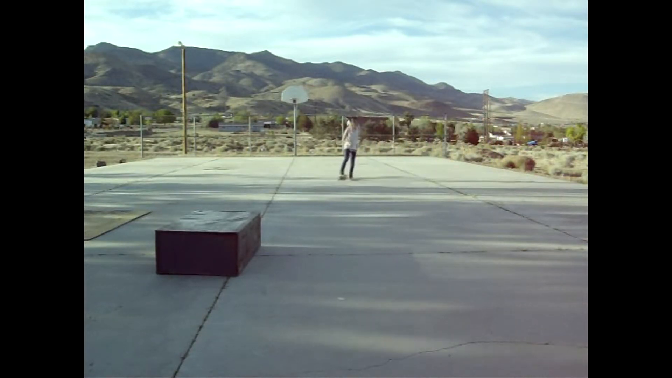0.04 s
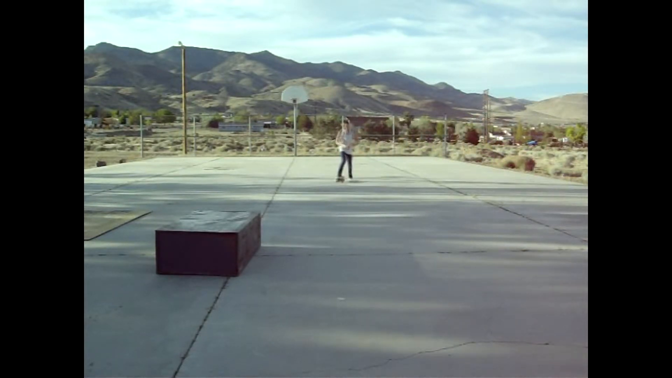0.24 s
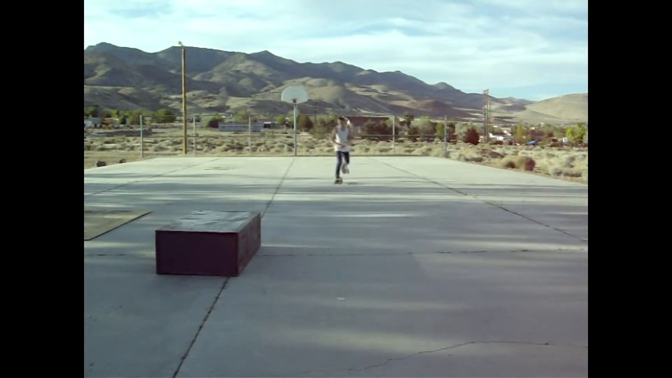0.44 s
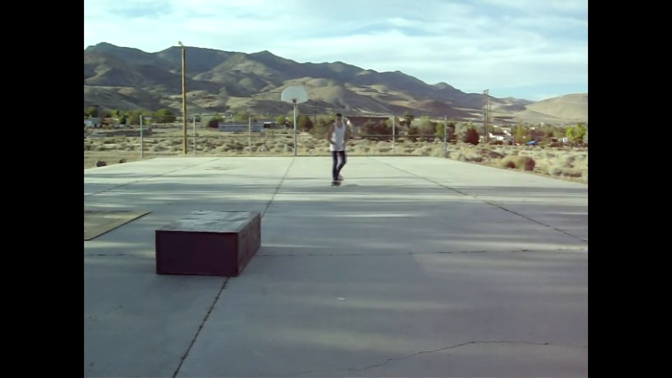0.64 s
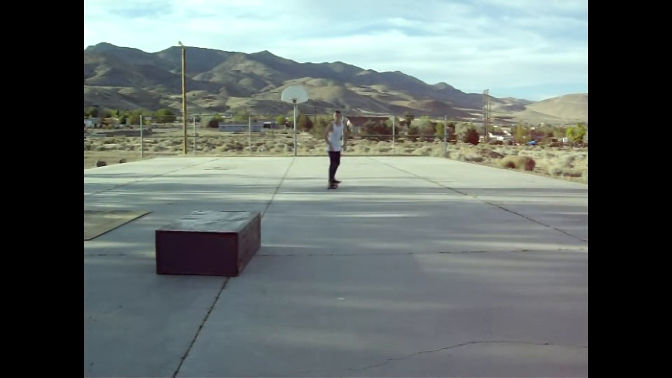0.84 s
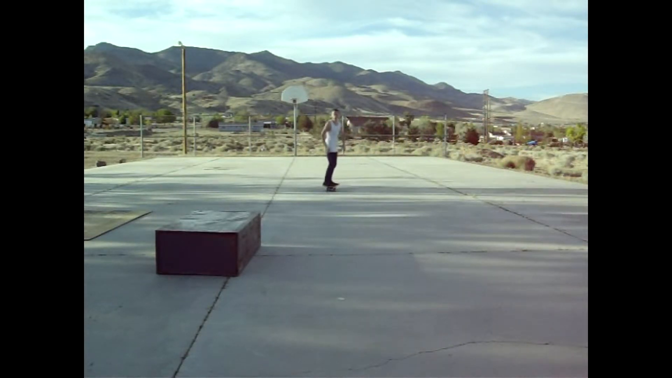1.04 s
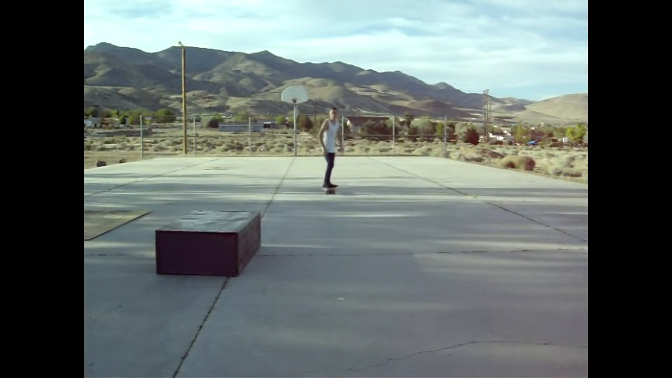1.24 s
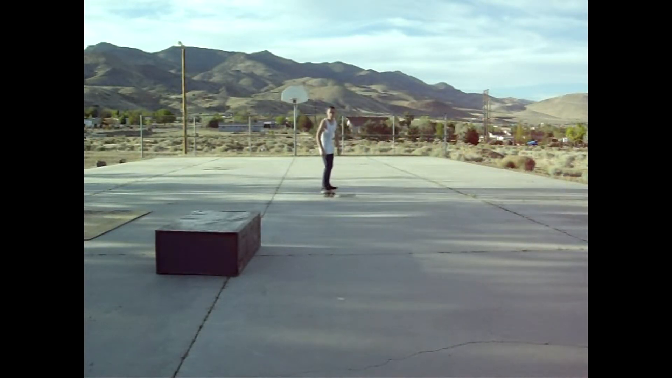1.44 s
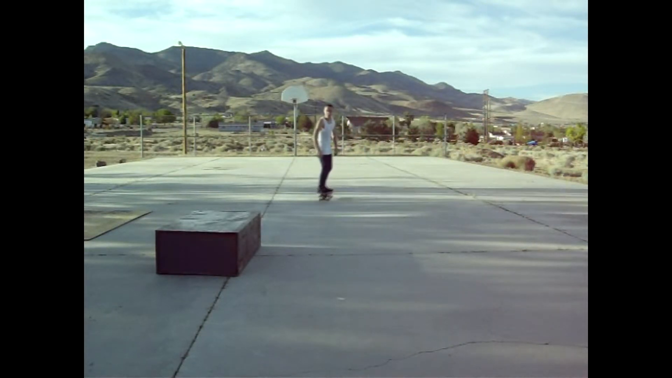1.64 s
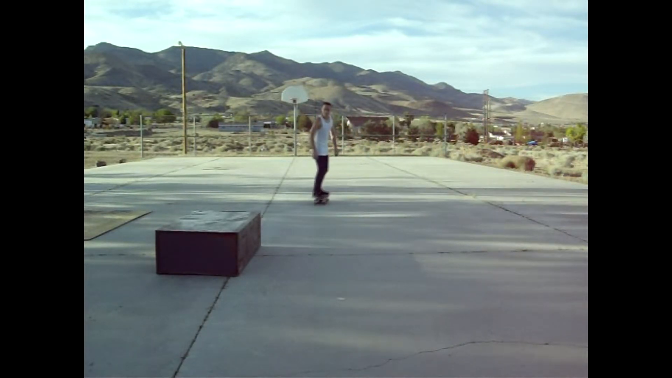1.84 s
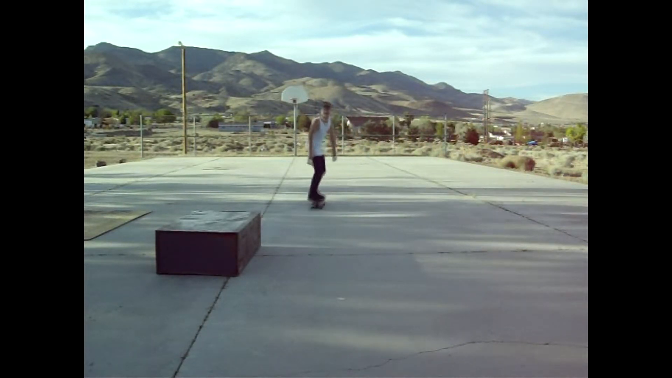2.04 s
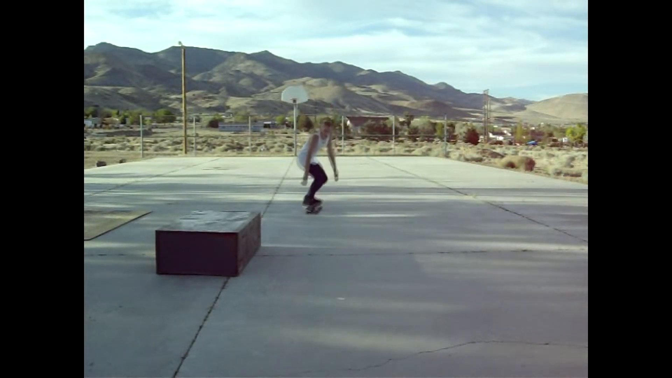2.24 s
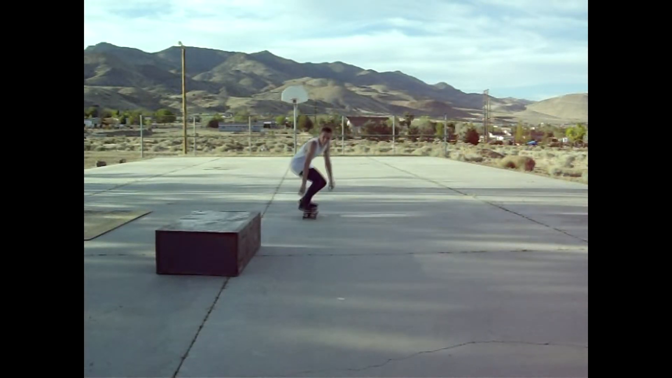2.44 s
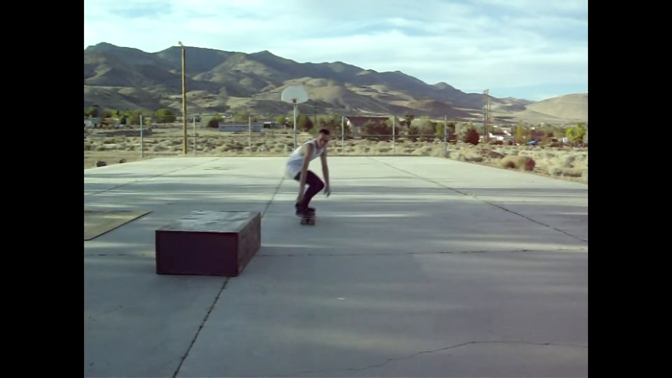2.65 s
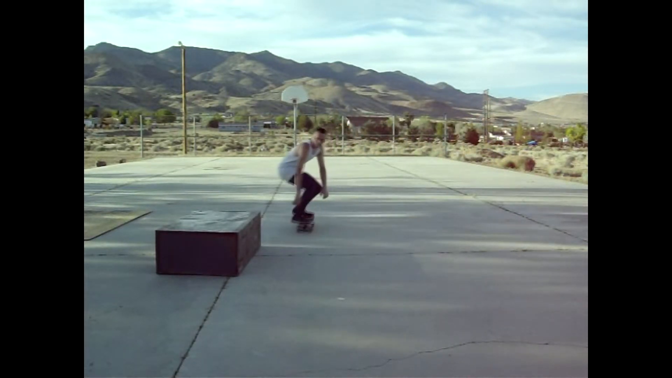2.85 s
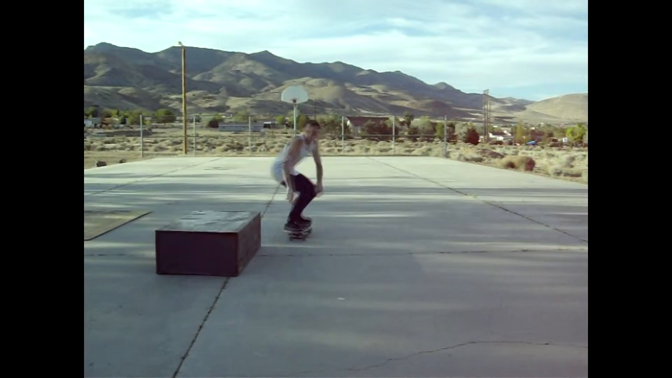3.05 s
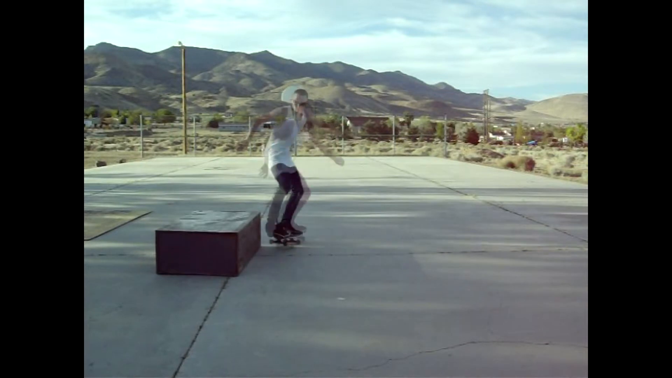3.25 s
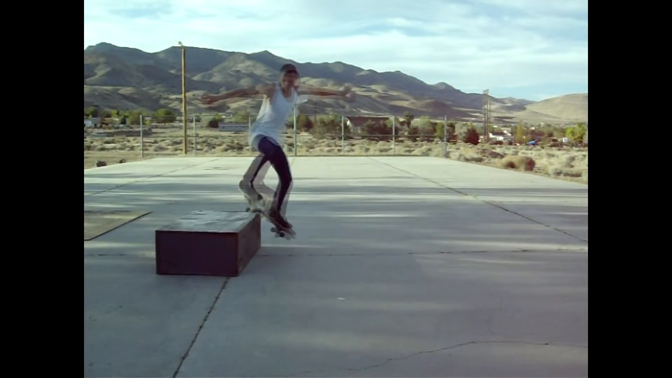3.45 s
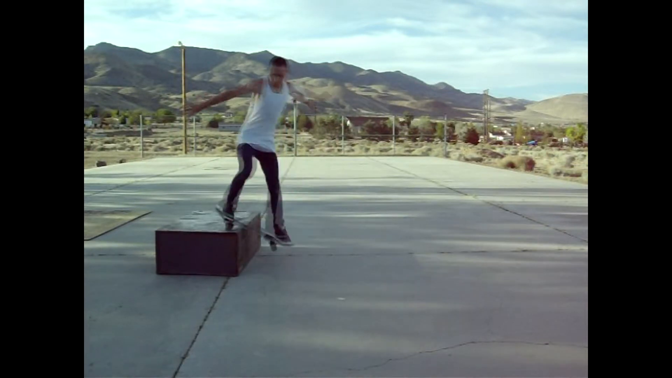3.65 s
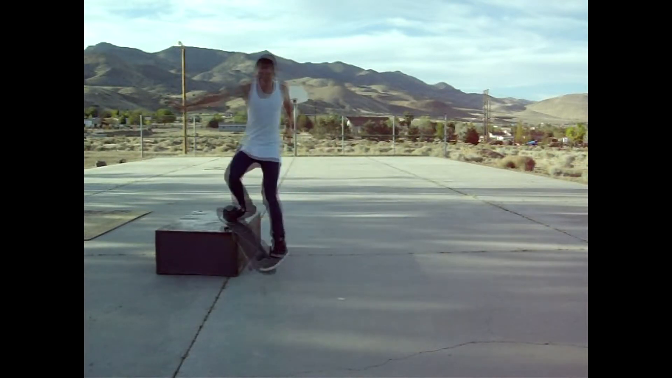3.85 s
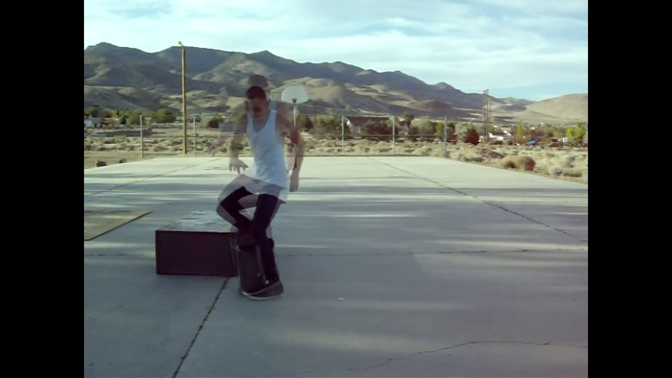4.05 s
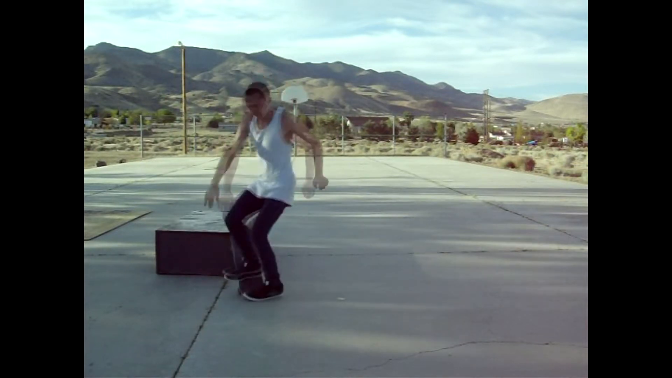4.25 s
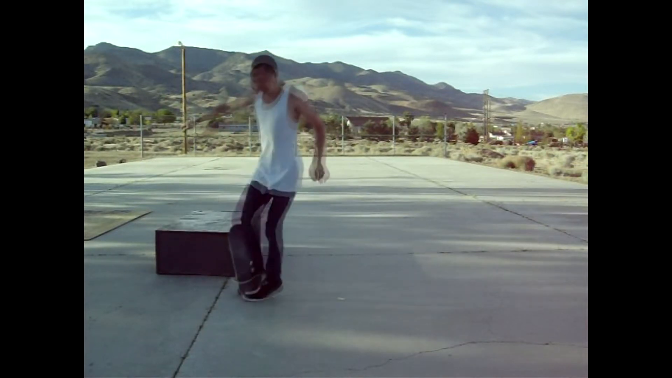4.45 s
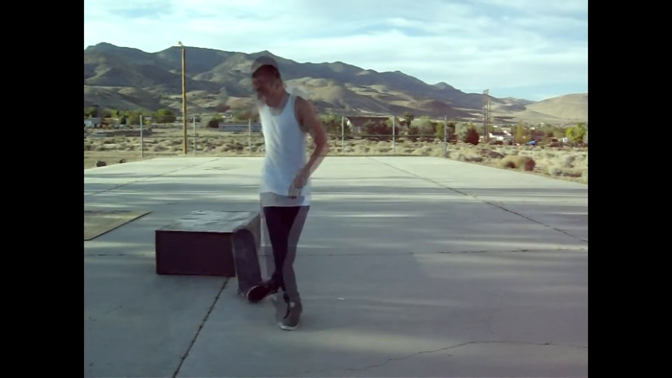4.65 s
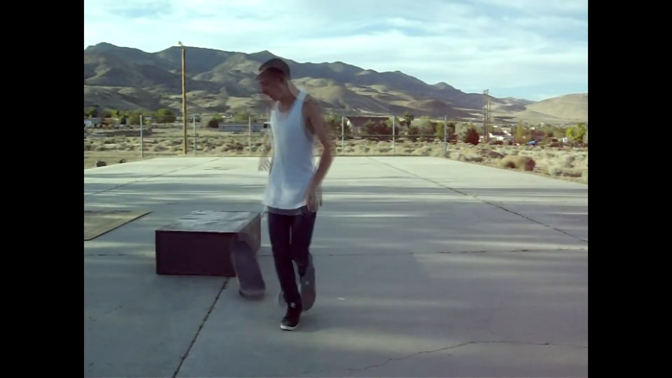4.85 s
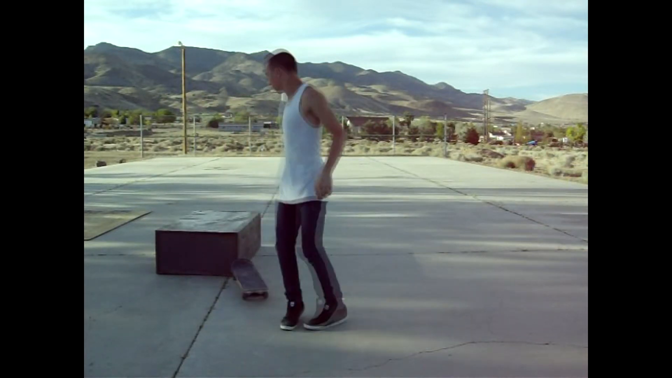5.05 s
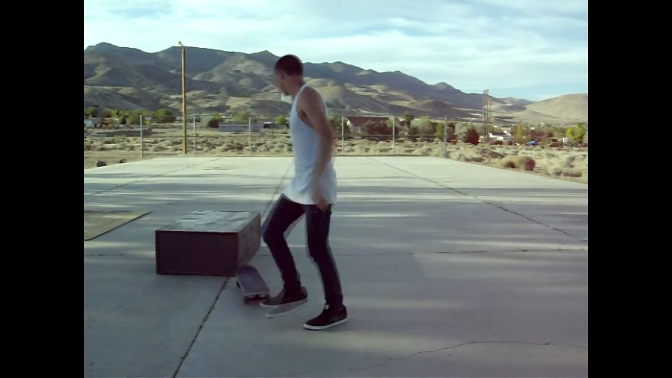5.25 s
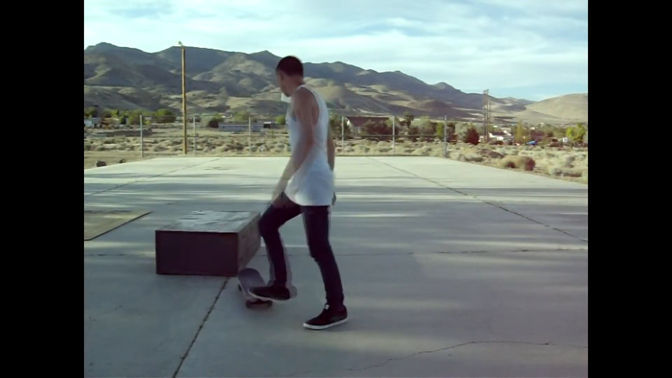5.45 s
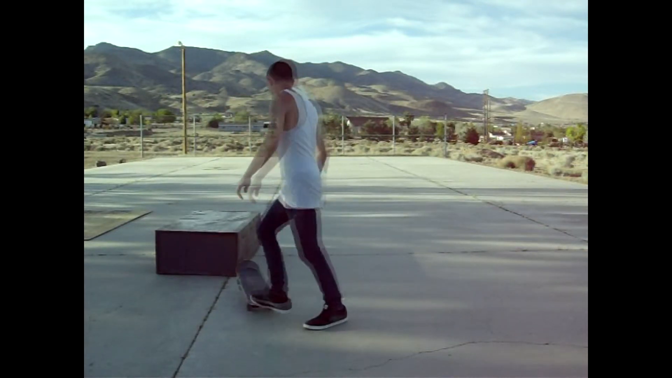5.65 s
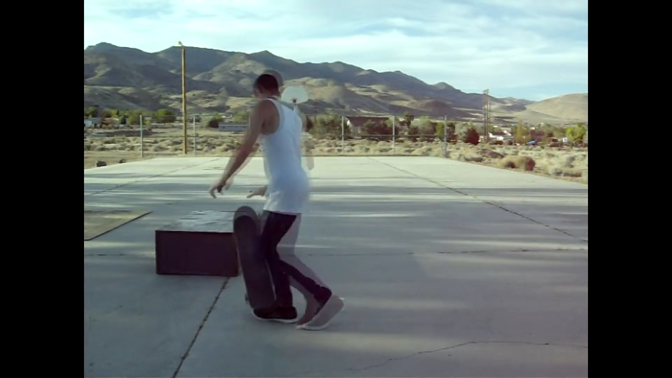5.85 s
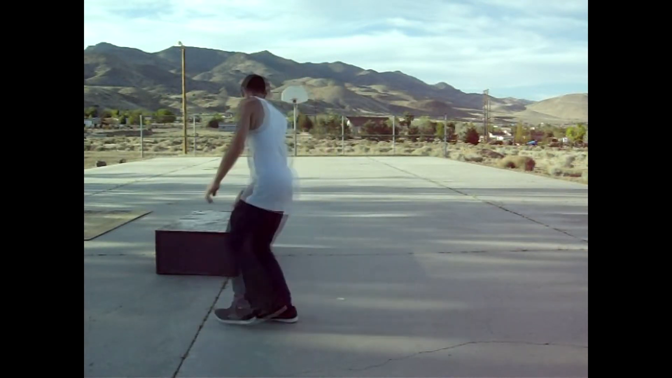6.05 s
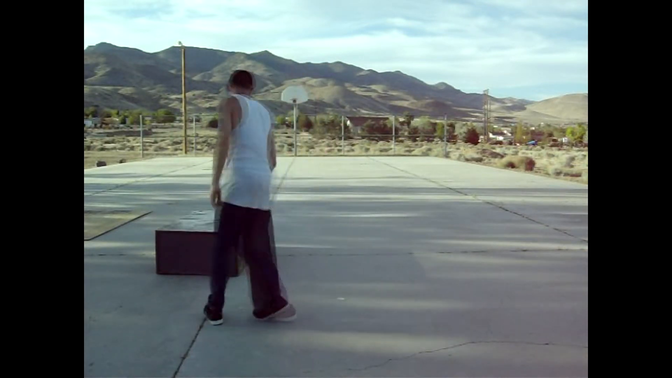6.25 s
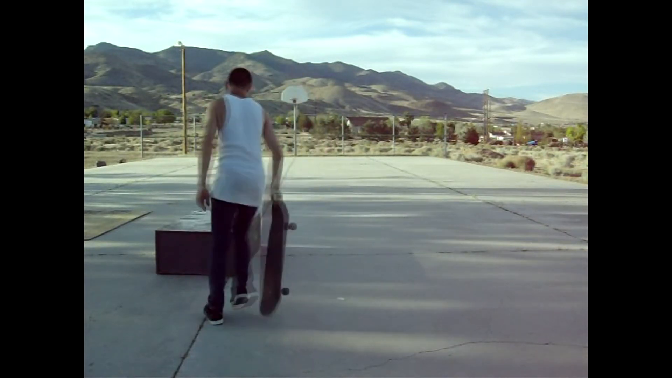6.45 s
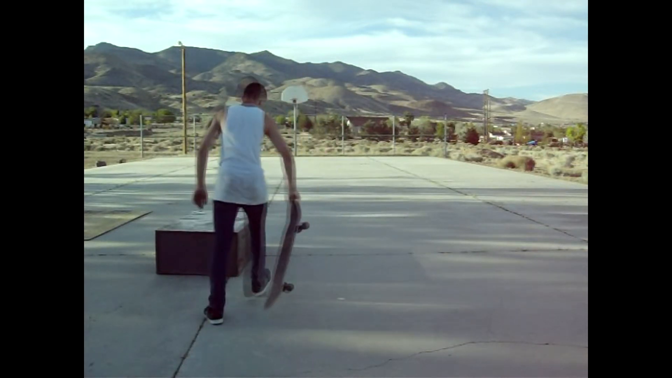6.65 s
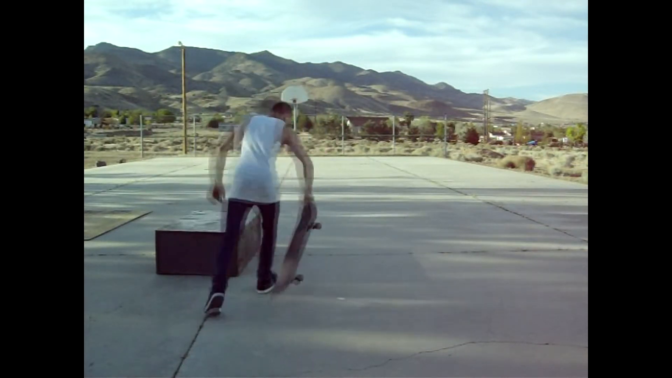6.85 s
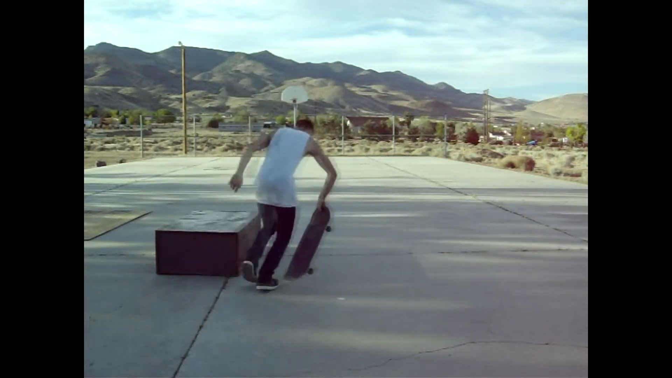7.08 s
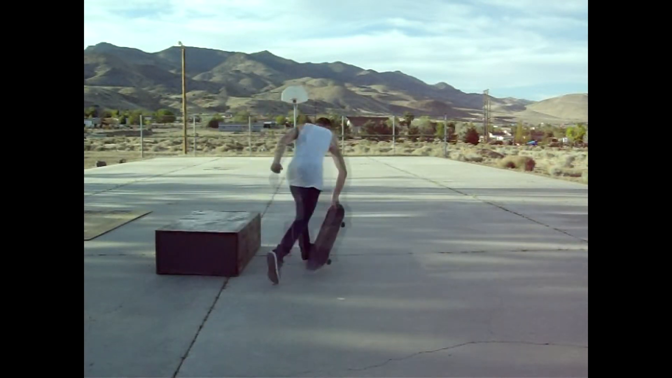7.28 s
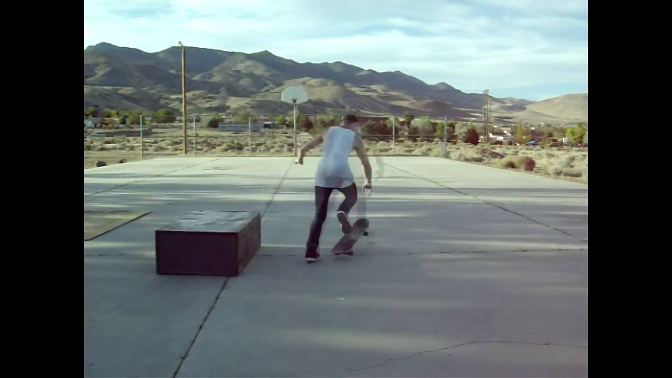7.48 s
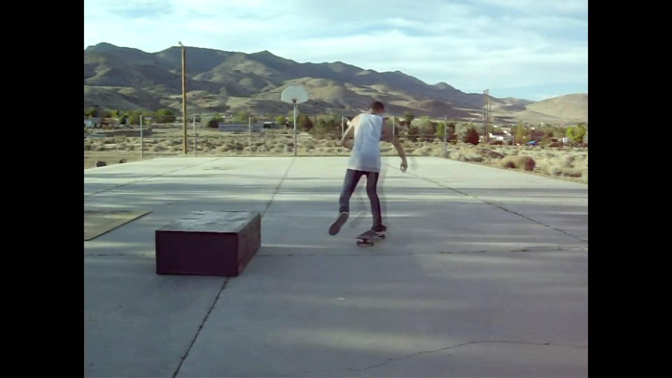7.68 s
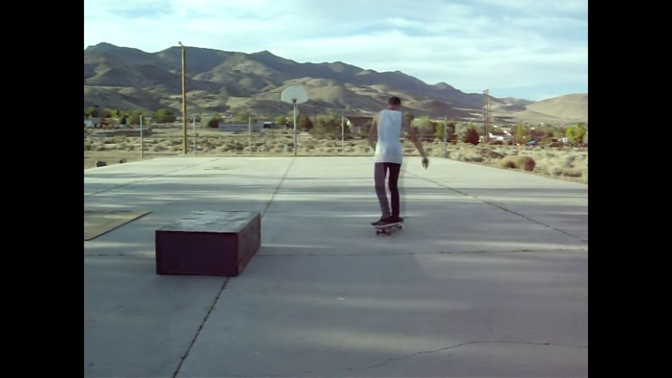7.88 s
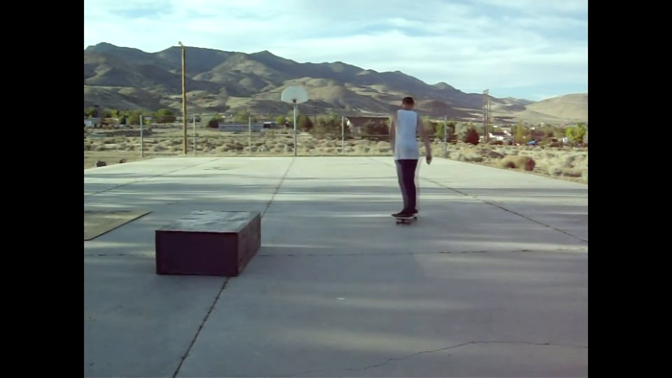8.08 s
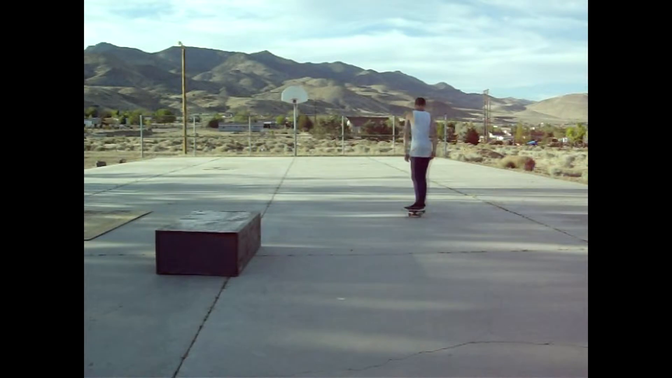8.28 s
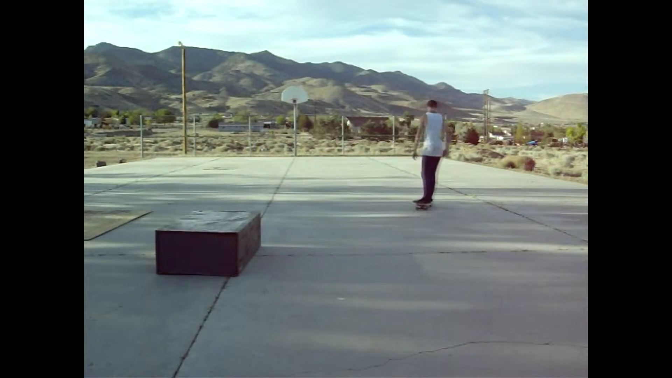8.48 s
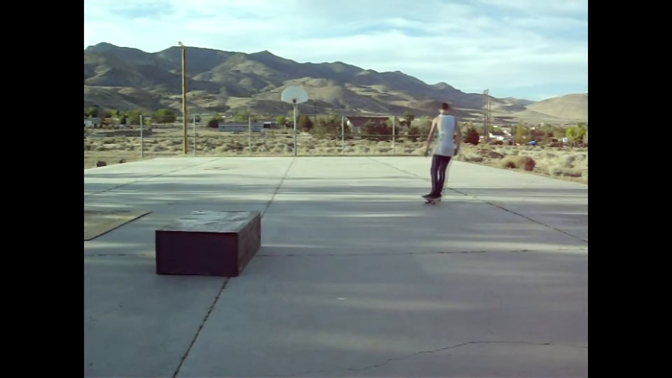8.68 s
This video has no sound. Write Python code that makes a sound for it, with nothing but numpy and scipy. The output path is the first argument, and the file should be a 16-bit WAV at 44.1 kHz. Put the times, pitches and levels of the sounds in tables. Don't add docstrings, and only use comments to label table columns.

```python
import sys
import numpy as np
from scipy import signal
from scipy.io import wavfile
from scipy.ndimage import uniform_filter1d

SR = 44100
rng = np.random.default_rng(int(sys.argv[2]) if len(sys.argv) > 2 else 0)


def ratio_of_db(decibels):
    return 10 ** (np.asarray(decibels, float) / 20)


def store_pcm(level_fs):
    pcm = np.round(np.clip(level_fs, -1, 1) * 32767).astype(np.int16)
    wavfile.write(sys.argv[1], SR, np.atleast_2d(pcm).T)


N = 384552

# time_s, hiss_db
HUSH_LEVEL = [(3.42, -32), (3.48, -42.5), (3.57, -42), (3.72, -28.5), (4.05, -31.5), (4.2, -34),
              (4.42, -42), (4.66, -36.5), (4.93, -43), (5.6, -39), (5.9, -38.5), (6.1, -46.5), (6.24, -41),
              (6.8, -34), (7.4, -31.5), (7.72, -42), (7.9, -41)]
# centre_hz, width_hz, level_db
WOOD_MODES = [(1270, 1800, -2), (1788, 253, 9), (2470, 180, -7), (1128, 46, 6), (3700, 590, -8.5),
              (1966, 150, 4), (1755, 55, 10), (2330, 24, 4), (1376, 44, -2)]
# centre_hz, width_hz, level_db
DECK_MODES = [
    [(447, 38, -6.5), (847, 83, 6.5), (1194, 180, 5.5), (1472, 160, 4.5), (1697, 77, 3.5), (1964, 83, 1.5)],
    [(480, 70, -26), (611, 77, -5.5), (1210, 53, 3.5), (1464, 145, 7.5), (1685, 71, 8.5), (2054, 210, 6.5)],
]


def evened(x):
    return x / np.sqrt(np.mean(x ** 2) + 1e-20)


def colour(x, points, lo_hz=0, hi_hz=30000):
    hz = np.fft.rfftfreq(4096, 1 / SR) + 1
    f, db = np.transpose(points)
    gain = ratio_of_db(np.interp(np.log(hz), np.log(f), db))
    gain = gain / np.sqrt((1 + (lo_hz / hz) ** 8) * (1 + (hz / hi_hz) ** 8))
    log_gain = np.log(np.maximum(np.r_[gain, gain[-2:0:-1]], 1e-6))
    phase = -signal.hilbert(log_gain).imag
    taps = np.fft.ifft(np.exp(log_gain + 1j * phase)).real
    return signal.oaconvolve(x, taps[:2048])[:len(x)]


def ring(x, modes):
    out = np.zeros(len(x))
    for k, (hz, width, db) in enumerate(modes):
        resonance = signal.iirpeak(hz, max(hz / width, .5), SR)
        out += (-1) ** k * ratio_of_db(db) * signal.lfilter(*resonance, x)
    return out


def curve(rows, column, off=-120.):
    rows = np.asarray(rows)
    return np.interp(np.arange(N) / SR, rows[:, 0], rows[:, column], off, off)


def bump(peak, rise, fall):
    t = np.arange(0, N + 32, 32) / SR - peak
    spread = np.where(t < 0, max(rise, .002), max(fall, .002))
    return np.repeat(np.exp(-.5 * (t / spread) ** 2), 32)[:N]


def flutter(hz):
    return evened(signal.lfilter(*signal.butter(2, hz, fs=SR), rng.standard_normal(N)))


def grit(per_s, spread_db, flutter_hz, flutter_db):
    draws = rng.random((N, 3))
    size = ratio_of_db(-spread_db * np.log(draws[:, 0] + 0.0015)) * np.sign(draws[:, 1] - .5)
    struck = draws[:, 2] < per_s / SR
    return evened(size * struck * ratio_of_db(flutter_db * flutter(flutter_hz)))


def ducking():
    # start_s, depth_db, recovery_s
    ducks = [
        (0.301, 7.5, 0.45),
        (0.56, 3, 0.071),
        (1.088, 3.5, 0.22),
        (2.189, 7, 0.067),
        (3.3, 7.5, 0.05),
        (3.43, -9.5, 0.057),
        (4.79, 21, 0.033),
        (5.83, 32, 0.15),
        (7.51, 21, 0.33),
    ]
    attack_s = 0.02
    t = np.arange(N) / SR
    gain_db = np.zeros(N)
    for s, depth_db, recovery_s in ducks:
        onset = np.clip((t - s) / attack_s, 0, 1)
        gain_db -= depth_db * onset * np.exp(-np.maximum(t - s, 0) / recovery_s)
    return gain_db


def rolling():
    # time_s, nearness_db, low_mode_weight_db
    rides = [
        [(0, -24, -0.5), (0.12, -19, -5.5), (0.27, -19, -6.5), (0.7, -19.5, 0), (1.0, -20, 0), (1.5, -24.5, 2),
         (1.75, -22.5, 2.5), (2.0, -21.5, 1.5), (2.3, -19, -2.5), (2.6, -19, 2), (2.85, -16.5, -1.5),
         (3.27, -16, -4.5), (3.41, -21.5, -9)],
        [(7.74, -36.5, 6), (7.88, -27, 2), (7.97, -20, -0.5), (8.05, -18.5, 2), (8.2, -16, 1.5), (8.5, -13, -1),
         (8.72, -14.5, 0)],
    ]
    # frequency_hz, density_db per Hz
    wheel_spectrum = [(100, -36.5), (200, -7.5), (500, 1.5), (860, -7.5), (1900, 1), (2250, -8.5),
                      (2600, -11), (2950, -9.5), (3400, -7), (4000, -10.5), (5500, -16)]
    # middle_s, half_length_s, boost_db
    rough = [
        (0.51, 0.054, 4),
        (0.812, 0.053, 6.5),
        (1.293, 0.05, 8.5),
        (1.621, 0.15, 8.5),
        (2.135, 0.04, 6),
        (3.24, 0.024, 7),
    ]
    crouch_s = (2.71, .4, 1)
    crouch_db = [9, 5.5, 5.5, -7.5, -5, 5]
    drive = grit(7500, 2.45, 32, 1.2)
    wheel = evened(colour(drive, wheel_spectrum, 0, 2400))
    hiss = evened(colour(drive, wheel_spectrum, 2630))
    swells = [ratio_of_db(1.63 * flutter(3.16) + db * bump(*crouch_s)) for db in crouch_db]
    roughness = ratio_of_db(sum(db * bump(s, half, half) for s, half, db in rough))
    split = [signal.butter(4, 980, side, fs=SR, output="sos") for side in ("low", "high")]
    out = np.zeros(N)
    for rows, deck in zip(rides, DECK_MODES):
        modes = sum(swell * ring(wheel, [mode]) for swell, mode in zip(swells, deck))
        body = .45 * wheel + evened(modes)
        low, high = (evened(signal.sosfilt(sos, body)) for sos in split)
        near_db = curve(rows, 1, -300)
        out += ratio_of_db(near_db) * (roughness * high + ratio_of_db(curve(rows, 2)) * low)
        out += ratio_of_db(-22 + 0.68 * (near_db + 22.0)) * hiss * roughness ** 0.38
    return out * ratio_of_db(ducking())


def wind():
    # peak_s, level_db, rise_s, fall_s
    gust_rows = [(0.27, -27, 0.076, 0.16), (0.51, -16.5, 0.12, 0.1), (0.7, -16.5, 0.17, 0.12),
                 (0.96, -14, 0.029, 0.025), (1.2, -21, 0.12, 0.11), (1.42, -21, 0.063, 0.044),
                 (2.95, -17.5, 0.027, 0.019), (3.21, -11, 0.068, 0.068), (3.38, -14.5, 0.062, 0.018),
                 (3.49, -32, 0.014, 0.01), (3.57, -31.5, 0.0083, 0.017), (4.3, -31, 0.033, 0.069),
                 (4.56, -20.5, 0.08, 0.099), (4.75, -18, 0.052, 0.013), (5.4, -35.5, 0.22, 0.056),
                 (5.65, -32, 0.073, 0.13), (6.13, -38, 0.025, 0.024), (6.75, -44, 0.049, 0.11),
                 (7.18, -37, 0.025, 0.016), (7.0, -27, 0.059, 0.05), (7.45, -38, 0.038, 0.035),
                 (8.2, -31, 0.049, 0.1)]
    # frequency_hz, density_db per Hz
    rumble = [(12, -68.5), (20, -13), (135, -0.5), (256, -6.5), (315, -5), (381, -6.5), (426, 0.5),
              (676, -7), (805, -21), (900, -5), (1170, -43.5), (1980, -120)]
    drive = grit(900, 2.2, 18, 1.8)
    dull = evened(colour(drive, rumble, 0, 300))
    edge = evened(colour(drive, rumble, 383, 713))
    breeze = ratio_of_db(curve(HUSH_LEVEL, 1, -25.0) - 2.5)
    gusts = breeze + sum(ratio_of_db(db) * bump(s, rise, fall) for s, db, rise, fall in gust_rows)
    gust_db = 20 * np.log10(gusts) + ducking()
    out = ratio_of_db(gust_db) * (dull + ratio_of_db(0.5 * (gust_db + 25.0) - 10.5) * edge)
    draught = evened(colour(drive, rumble, 0, 110))
    return out + ratio_of_db(-37.5) * bump(6.86, 0.44, 0.41) * draught


def buffeting():
    # peak_s, level_db, swing_hz, width_s
    hard = [(0.235, 5.5, 165, 0.0056), (0.25, 8, 197, 0.0031), (0.459, -2.5, 165, 0.0063),
            (0.522, 4, 132, 0.0046), (0.55, -0.5, 182, 0.0046), (0.564, 2, 243, 0.0047),
            (0.61, 3, 226, 0.0027), (0.624, -3, 196, 0.013), (0.943, 3.5, 268, 0.0042),
            (1.067, -0.5, 200, 0.0059), (1.387, 0, 183, 0.0033), (1.513, -6, 153, 0.009),
            (1.528, 3.5, 189, 0.0036), (2.936, -3, 152, 0.006), (3.113, -1.5, 181, 0.0052),
            (3.179, -3, 157, 0.005), (3.267, -7.5, 160, 0.0073), (3.315, 5.5, 270, 0.0033),
            (3.356, 1, 273, 0.0025), (3.377, 6, 199, 0.0016), (3.394, -2.5, 154, 0.0074),
            (3.408, 2, 324, 0.0047)]
    late_hard = [(4.531, -6, 233, 0.0028), (4.549, -2.5, 242, 0.0063), (4.59, -7.5, 218, 0.0032),
                 (4.623, -0.5, 267, 0.0029), (4.638, -10.5, 223, 0.017), (4.734, -0.5, 182, 0.0043),
                 (5.068, -6, 310, 0.0017), (5.619, -13, 144, 0.0052), (5.65, -9.5, 145, 0.0087),
                 (6.357, -18.5, 118, 0.017), (6.957, -19, 146, 0.0056), (7.011, -5.5, 160, 0.0052),
                 (7.489, -6.5, 398, 0.0055), (8.102, -9.5, 195, 0.006), (8.122, -6.5, 307, 0.0022),
                 (8.154, -7, 214, 0.0065), (8.199, -3, 415, 0.0019)]
    further = [(0.195, -5, 166, 0.0041), (0.326, -11, 324, 0.0042), (0.436, -11, 171, 0.004),
               (0.45, -16, 204, 0.0031), (0.469, -2.5, 266, 0.0031), (0.539, 1, 235, 0.0019),
               (0.575, -10, 177, 0.0023), (0.585, -6, 239, 0.0065), (0.651, -5, 142, 0.0041),
               (0.66, -12, 204, 0.003), (0.718, -7, 200, 0.0036), (0.73, -14, 242, 0.0035),
               (0.919, -5.5, 444, 0.0031), (0.924, -15, 239, 0.0022), (0.933, -10, 216, 0.0038),
               (0.953, -3, 261, 0.002), (0.963, -16, 332, 0.0025), (0.981, -11, 161, 0.0089),
               (1.014, -8.5, 225, 0.0042), (1.044, -9, 169, 0.0066), (1.062, -13, 176, 0.0026),
               (1.175, -9.5, 156, 0.0095), (1.182, -9, 218, 0.003), (1.207, -9, 223, 0.0032),
               (1.254, -6.5, 210, 0.0056), (1.402, -15, 182, 0.0031), (1.429, -12, 148, 0.0057),
               (1.478, -8, 214, 0.0038), (1.89, -5.5, 423, 0.0016), (2.948, -10, 201, 0.0025),
               (2.958, -12, 228, 0.0024), (3.126, -7.5, 215, 0.0094), (3.149, -6, 200, 0.0041),
               (3.171, -10, 186, 0.0032), (3.215, 0, 170, 0.0056), (3.233, -1, 284, 0.004),
               (3.247, 0, 274, 0.0027), (3.276, -3, 194, 0.003), (3.297, 0, 282, 0.0034),
               (3.37, -8, 184, 0.0035), (3.386, -7, 196, 0.0033)]
    late_further = [(3.801, -21, 340, 0.009), (3.823, -17.5, 282, 0.0062), (3.84, -24, 229, 0.0041),
                    (3.858, -24, 255, 0.0025), (3.883, -22, 265, 0.0038), (3.901, -16, 323, 0.0027),
                    (3.938, -12, 211, 0.0025), (3.963, -15, 196, 0.0055), (4.091, -14, 350, 0.0025),
                    (4.103, -19, 395, 0.0028), (4.319, -15.5, 273, 0.0021), (4.427, -22, 206, 0.0048),
                    (4.465, -16, 320, 0.0031), (4.489, -12, 285, 0.0038), (4.501, -14, 240, 0.0032),
                    (4.613, -4.5, 155, 0.0067), (4.646, -10, 209, 0.0088), (4.697, -14, 220, 0.0044),
                    (4.724, -3, 234, 0.0033), (4.745, -5, 243, 0.0038), (4.756, -6, 263, 0.0035),
                    (4.769, -14, 196, 0.0046), (5.06, -17, 240, 0.0029), (5.224, -21, 261, 0.0043),
                    (5.409, -23, 199, 0.013), (5.542, -20, 166, 0.0051), (5.633, -16, 206, 0.006),
                    (5.674, -17.5, 175, 0.0075), (5.693, -20, 159, 0.004), (6.969, -20, 195, 0.003),
                    (7.002, -10, 126, 0.0039), (7.019, -14, 160, 0.0039), (7.034, -20, 171, 0.0026),
                    (7.385, -18, 350, 0.0019), (7.392, -16, 424, 0.002), (8.358, -16, 486, 0.0038)]
    eddies = hard + late_hard + further + late_further
    turns = -0.14 + 0.35 * (rng.random(len(eddies)) - .5)
    t = np.arange(-1500, 1500) / SR
    out = np.zeros(N)
    for (s, db, hz, width_s), turn in zip(eddies, turns):
        spread = np.where(t < 0, 0.45, 0.55) * width_s
        swing = np.exp(-.5 * (t / spread) ** 2) * np.cos(2 * np.pi * (hz * t + turn))
        snap = np.exp(-.5 * (t / (0.24 * width_s)) ** 2) * np.cos(2 * np.pi * (2.0 * hz * t + turn))
        out[round(s * SR) - 1500:][:len(t)] += ratio_of_db(db) * (swing + .4 * snap)
    return out


def blows():
    # peak_s, level_db, thud_db re peak, tick_db re peak, t60_s
    joints = [
        (0.526, -2.5, -1, -2, 0.034),
        (0.966, -1.5, -20, -4.5, 0.033),
        (0.995, -15.5, -20, 2.5, 0.13),
        (1.074, -3, -1.5, -3.5, 0.039),
        (1.084, 4.5, 1, 0, 0.012),
        (1.888, 0.5, 7.5, 2, 0.029),
        (1.896, 4.5, 5, -12, 0.019),
        (2.057, -0.5, -1.5, -4.5, 0.055),
        (2.097, -0.5, -5, -1, 0.027),
        (2.16, 3.5, -14, -5.5, 0.034),
    ]
    box_blows = [(3.4135, -5, -13, 1.5, 0.03), (3.5832, -9.5, -9.5, 0.5, 0.059),
                 (3.6025, -16.5, -5, 10.5, 0.033), (4.0, -10.5, -3.5, 10.5, 0.026),
                 (4.0655, -6.5, -14, 2, 0.044), (4.0765, -13, 4, 4.5, 0.059), (4.142, -16.5, -8, -3, 0.024),
                 (4.391, -17, -7, -8.5, 0.021), (4.6832, -9.5, 9, -8, 0.011),
                 (4.703, -26.5, -12, 10.5, 0.047), (4.769, -12.5, -7, 8.5, 0.021),
                 (4.887, -27.5, -4.5, -8, 0.14), (4.951, -20, -8, 6, 0.11)]
    soft = [(3.708, -31, -5, 15, .04), (3.748, -29, -5, 1, .04), (3.921, -20, 6, -5, 0.046),
            (3.952, -19, -8, 1, .05), (3.969, -5.5, -11, 2.5, 0.046), (3.985, -6, -6, -2, 0.05),
            (4.027, -14, -16, -8, 0.035), (4.101, -21, 5, 4, 0.046), (4.194, -24, 1.5, -1, 0.1),
            (4.851, -9, -8.5, -7, 0.058), (5.34, -10.5, -21, -6, 0.055), (5.574, -17.5, -11, -6, 0.069),
            (5.752, -29, -1, 8.5, 0.089), (6.008, -32, -1, -2, 0.099), (6.049, -21, -1, 2, 0.039),
            (6.226, -34, -17, 12, 0.057), (7.741, -24.5, -1, -2, 0.045)]
    ticks = [(3.7908, -16, -12, 5.5, 0.009), (4.5435, -34.5, 22, -13, 0.018), (4.6225, -26.5, 15, -9, .01),
             (4.726, -26, 11, -15, 0.014), (5.311, -18, -26, -9, .025), (5.363, -22, -29, -9, 0.018),
             (5.399, -24, -22, -11, 0.027), (5.454, -25, -25, -10, 0.016), (5.479, -21.5, -25, -13, 0.032),
             (5.821, -13.5, -20, 9.5, 0.02), (7.531, -18, -15, 1, 0.02), (7.6868, -4.5, -15, -3, 0.01),
             (5.373, -24, -27, -8, .015), (5.2, -29, -22, -6, .03), (5.483, -21, -18, -8, 0.016),
             (7.4935, -13.5, 4, -5, .015), (5.239, -8.5, -18, -2, .015), (5.4685, -19, -23, -8, .012)]
    clatter = [(5.017, -24, -23, -2, 0.046), (5.0691, -4.5, -12, -3, 0.053), (5.235, -2, -23, -11, 0.038),
               (5.304, -13, -18, -7, 0.16), (5.429, -21, -26, -25, 0.041), (5.468, -21, -35, -10, 0.095),
               (5.521, -30, -9, -22, 0.081), (5.625, -20, -15, -11, 0.026), (5.666, -30, -2, -4, 0.05),
               (5.816, -8.5, 1, 3.5, 0.033), (5.854, -19, -10, -5, 0.038)]
    throw = [
        (6.066, -31.5, 0, -1, 0.075),
        (6.765, -35, -6, 17.5, 0.059),
        (6.798, -24.5, -3, -1, 0.048),
        (7.384, -28, 14, -16, 0.025),
        (7.4875, -6.5, -4.5, 0, 0.076),
        (7.5923, -14, -8, 1, 0.055),
        (7.6171, -5.5, -3.5, -1.5, 0.059),
        (7.663, -26, 2, 7, 0.069),
        (7.682, -12, -4, -4, 0.066),
    ]
    # frequency_hz, density_db per Hz
    blow_spectrum = [(150, -17), (450, -4.5), (860, -6.5), (1500, -2), (2000, -1.5), (2600, -2), (3300, -1),
                     (3900, -1), (5500, -10)]
    kinds = (  # events, crack height, rise of the rattle in s
        (box_blows + clatter + throw, 1.1, .0015), (joints, .05, .005), (soft, .04, .004), (ticks, 1.5, .001))
    t = np.arange(6000) / SR
    trains = np.zeros((3, N + len(t)))
    for events, crack, rise_s in kinds:
        for s, db, thud_db, tick_db, t60 in events:
            noise = rng.standard_normal(len(t))
            rattle = (1 - np.exp(-t / rise_s)) * ratio_of_db(-60 * t / np.clip(t60, .008, .2))
            clumps = evened(uniform_filter1d(noise[::-1], size=60))
            rattle = rattle * ratio_of_db(3.5 * clumps - 1.0)
            burst = np.sign(noise) * crack * ratio_of_db(-60 * t / 0.0057) + noise * rattle
            shares = ratio_of_db(db + np.array([[thud_db], [0], [tick_db]]))
            trains[:, round(s * SR):][:, :len(t)] += shares * burst
    paths = (lambda x: colour(x, blow_spectrum, 0, 800),
             lambda x: colour(x + 1.16 * ring(x, WOOD_MODES), blow_spectrum, 950, 1960),
             lambda x: colour(x + 1.0 * ring(x, WOOD_MODES), blow_spectrum, 1940))
    probe = rng.standard_normal(SR)
    return sum(path(train[:N]) / np.std(path(probe)) for path, train in zip(paths, trains))


def hush():
    # frequency_hz, density_db per Hz
    air_spectrum = [(100, -16.5), (250, -10.5), (520, -4.5), (860, -8.5), (2700, -11), (3700, -5),
                    (4200, -11), (5500, -11.5)]
    return ratio_of_db(curve(HUSH_LEVEL, 1) + 4.5) * evened(colour(grit(22000, 0.78, 40, 1.0), air_spectrum))


def friction():
    return grit(6500, 2.2, 70, 2.0)


def slides():
    # peak_s, rise_s, fall_s, hiss_db, body_db
    slide_rows = [(3.8, 0.044, 0.092, -24.5, -31.5), (3.98, 0.034, 0.019, -24, -19),
                  (4.12, .02, 0.05, -42, -38), (4.73, 0.034, 0.043, -31, -29.5),
                  (4.96, .005, 0.033, -36, -48), (5.01, 0.023, 0.034, -49, -25.5),
                  (5.1, 0.02, 0.043, -31, -23.5), (5.26, 0.013, 0.026, -33, -23.5),
                  (5.36, 0.12, 0.046, -63, -31), (5.49, 0.04, 0.021, -59, -31.5),
                  (5.813, 0.01, 0.0049, -21, -24), (7.33, 0.045, 0.015, -31, -35),
                  (7.44, 0.027, 0.016, -24, -23.5), (7.53, 0.02, 0.029, -27, -21),
                  (7.62, 0.03, 0.072, -38, -27.5)]
    # frequency_hz, density_db per Hz
    rub_spectrum = [(300, -11), (1000, -2), (1700, 1.5), (2500, -3), (3100, -7), (3750, -9.5), (4300, -9.5),
                    (5500, -17.5)]
    # centre_hz, width_hz, level_db
    squeal = [
        (3750, 450, 12.5),
    ]
    rub = friction()
    hiss = evened(colour(rub + ring(rub, squeal), rub_spectrum, 2800))
    loose, ridden = (evened(colour(rub + 2.4 * ring(rub, modes), rub_spectrum, 0, 2500))
                     for modes in (WOOD_MODES, DECK_MODES[1]))
    out = np.zeros(N)
    for peak, rise, fall, hiss_db, body_db in slide_rows:
        body = ridden if peak > 7.48 else loose
        out += bump(peak, rise, fall) * (ratio_of_db(hiss_db) * hiss + ratio_of_db(body_db) * body)
    return out


def grind():
    # centre_hz, width_hz, level_db
    box_modes = [
        (169, 12, 0),
        (307, 110, -0.5),
    ]
    box = evened(ring(ring(friction(), box_modes), [(300, 1200, 0)]))
    return ratio_of_db(-27 + 4.0 * flutter(25)) * bump(3.986, 0.26, 0.046) * box


def hums():
    # start_s, stop_s, pitch_hz, level_db
    tones = [
        (6.198, 6.3, 480, -51),
        (6.274, 6.57, 538, -43),
        (6.544, 6.815, 472, -39.5),
        (7.15, 7.353, 463, -42),
    ]
    out = np.zeros(N)
    for start, stop, hz, db in tones:
        t = np.arange(start, stop, 1 / SR)
        tone = np.sin(2 * np.pi * hz * t) * signal.windows.tukey(len(t), .3)
        out[round(start * SR):][:len(t)] += ratio_of_db(db) * tone
    return out * ratio_of_db(1.3 * flutter(12))


def shoe_drag():
    # centre_hz, width_hz, level_db
    sole_modes = [
        (1700, 320, -10.5),
        (3300, 550, 3),
        (4350, 880, -3),
    ]
    return ratio_of_db(-11) * bump(7.455, 0.019, 0.0071) * evened(ring(grit(22000, 0.9, 80, 1.0), sole_modes))


def scene():
    board = rolling() + blows() + slides() + grind() + shoe_drag()
    air = wind() + buffeting() + hush() + hums()
    return (board + air)[None]


def roll_off(x):
    return signal.sosfilt(signal.butter(12, 17800, fs=SR, output="sos"), x)


def record(dry):
    # frequency_hz, gain_db
    microphone = [(20, 0), (3900, -3), (4500, -6.5), (5000, -13.5), (5500, -14.5)]
    # frequency_hz, gain_db
    mirror = [(5512, 0), (6025, -8), (6525, -15), (7325, -25), (8025, -33), (9025, -50), (9825, -60),
              (11000, -105), (12225, -75), (13025, -70), (14000, -75), (15500, -95)]
    heard = colour(dry[0], microphone)
    flat = heard / (1 + abs(heard / 1.025) ** 7.0) ** (1 / 7.0)
    spaced = np.zeros(N)
    spaced[::4] = 4 * signal.resample_poly(flat, 1, 4)
    smoothed = colour(spaced, mirror)[None]
    return roll_off(np.clip(smoothed - .0024, -1, 1))


dry = scene()
out = record(dry)
store_pcm(out)
```